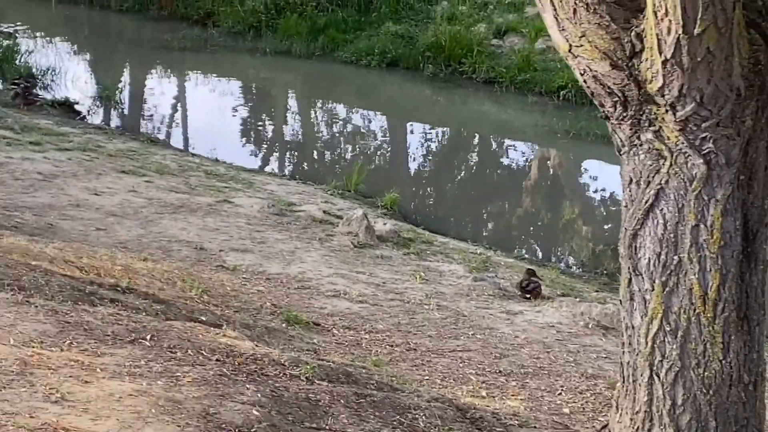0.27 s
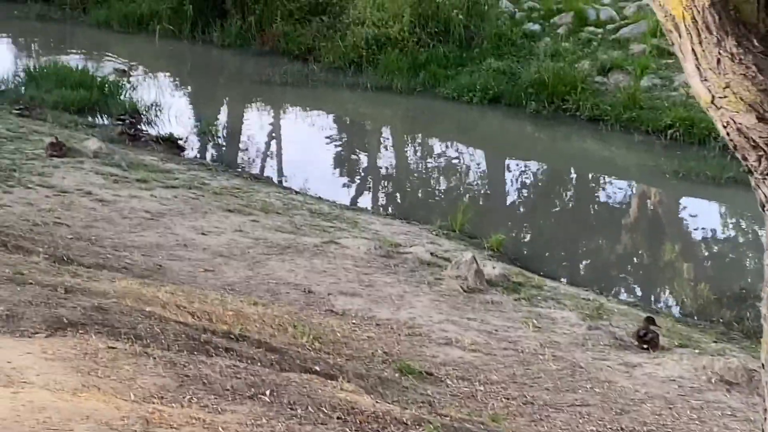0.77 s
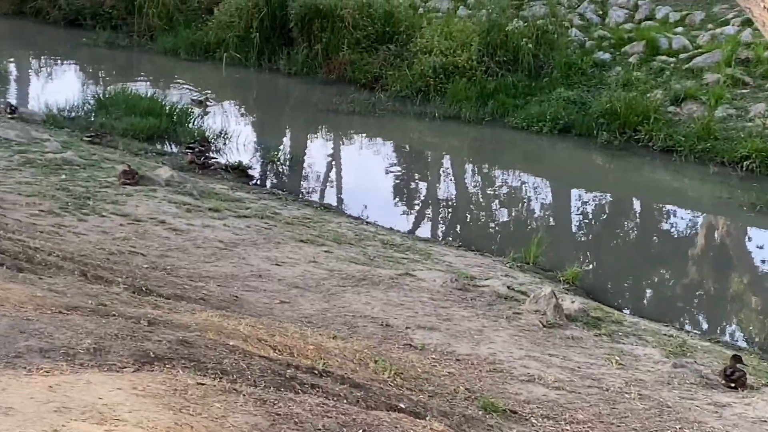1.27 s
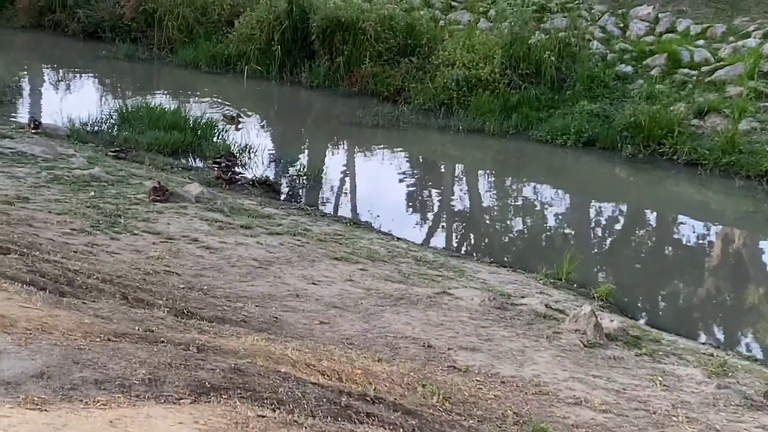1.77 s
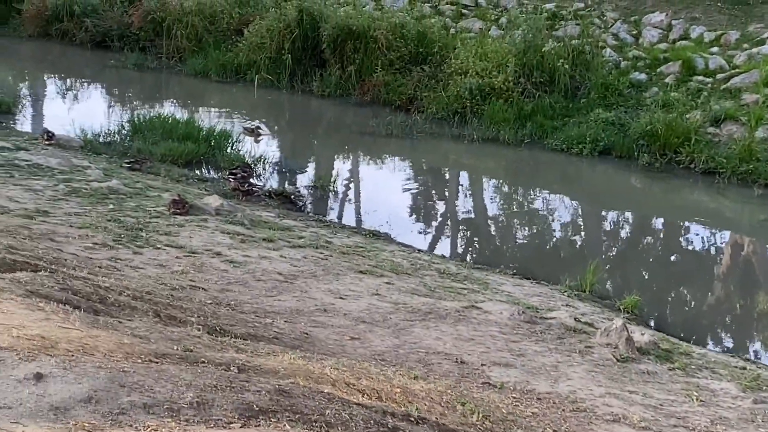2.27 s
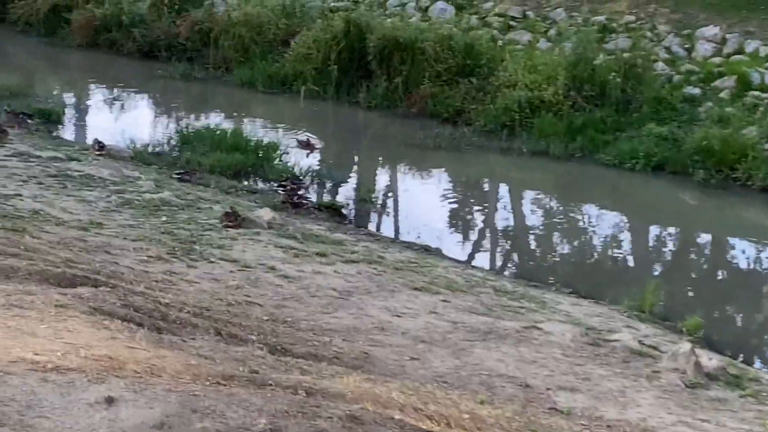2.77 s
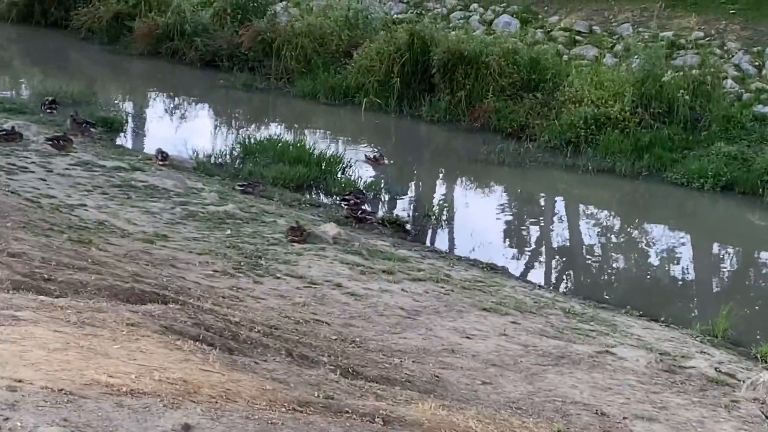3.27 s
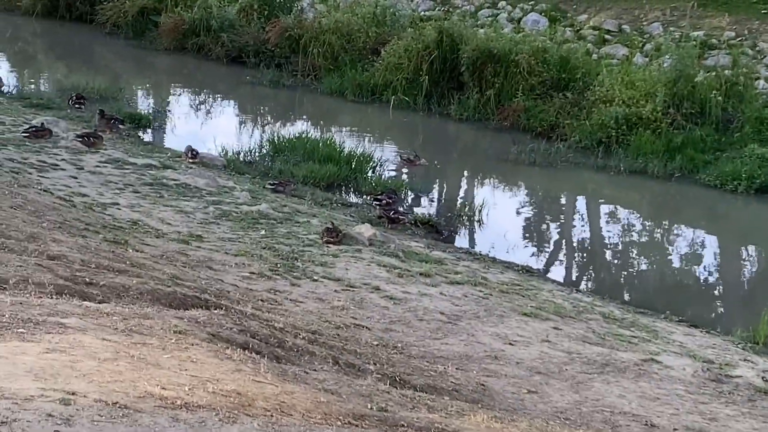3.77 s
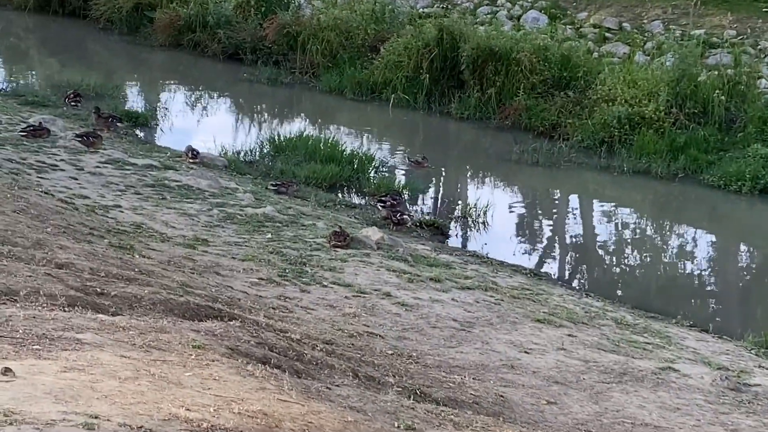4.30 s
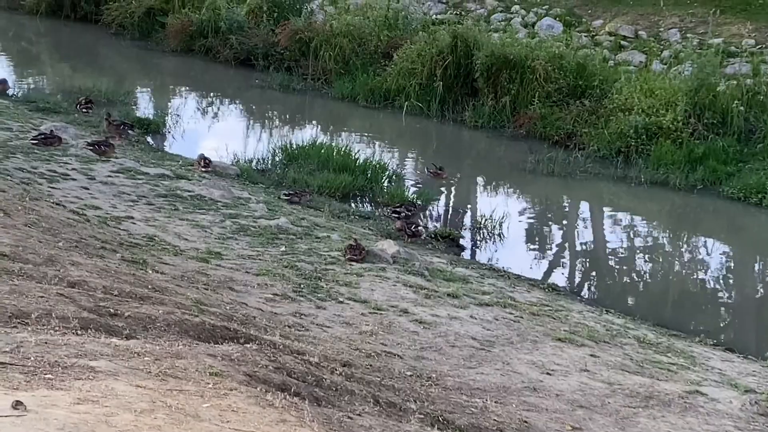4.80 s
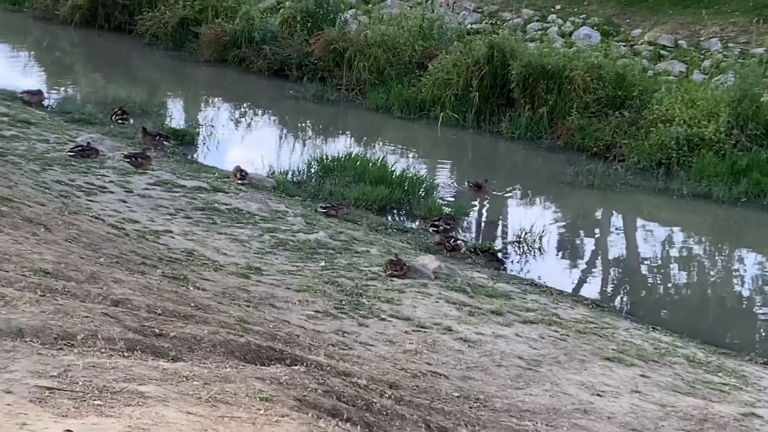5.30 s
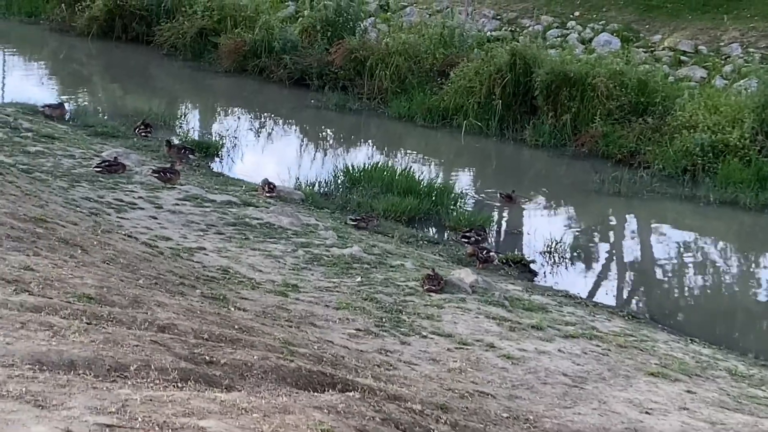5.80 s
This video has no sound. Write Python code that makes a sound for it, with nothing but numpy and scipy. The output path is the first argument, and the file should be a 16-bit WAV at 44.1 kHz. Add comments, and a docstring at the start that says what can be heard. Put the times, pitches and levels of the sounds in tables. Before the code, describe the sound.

Irregular dull footsteps thud and crunch on dry dirt while sparrows chirp in the trees and a far road murmurs.

```python
"""Footsteps on the dry dirt bank of a slow stream, close under a phone held by the person stepping.
Heel and sole push on the ground in dull thuds; grit snaps and scrapes beneath them. Up in the trees
sparrows chirp in raspy arches of pitch and a smaller bird pipes thin notes above them, all scattered
by trunks and leaves. A far road murmurs with rumble and tyre noise, one engine slowly gathering speed."""
import sys
import numpy as np
from scipy import signal
from scipy.fft import rfft, irfft
from scipy.io import wavfile
from scipy.ndimage import uniform_filter1d

SR = 44100
rng = np.random.default_rng(int(sys.argv[2]) if len(sys.argv) > 2 else 0)


def int16_out(signal):
    """Quantize to a 16-bit WAV file."""
    q = np.round(np.clip(np.atleast_2d(signal).T, -1, 1) * 32767)
    wavfile.write(sys.argv[1], SR, q.astype(np.int16))


N = 266760
TIME = np.arange(N) / SR

# Spectra of the far road, its rumble and its tyres: frequency_hz, relative_density_db
RUMBLE_SPECTRUM = [(12, -46.5), (20, -20), (35, -5), (54, 3), (141, -9.5), (226, -17), (312, -18.5),
                   (338, -22), (500, -26), (650, -45), (1100, -120)]
TYRE_SPECTRUM = [(240, -35.5), (400, -8.5), (601, -5.5), (959, 1), (1230, -7), (1530, -6), (1720, -11.5),
                 (1870, -12), (2440, -16), (3140, -16), (4660, -20), (5250, -22), (5850, -25.5),
                 (6360, -24), (7000, -36.5), (9100, -75), (15400, -120)]
# Slow swells of the road, centred and scaled down in traffic(): time_s, rumble_db, tyre_db
ROAD_SWELLS = [(0.0, -32.5, -45.5), (0.35, -36, -47), (0.67, -31.5, -45.5), (1.11, -35.5, -46.5),
               (1.38, -39.5, -45), (2.85, -32.5, -45), (3.59, -38.5, -45), (4.19, -38, -45.5),
               (4.51, -39.5, -44), (5.71, -40, -44.5), (6.05, -38, -45)]
# Steps below the microphone, heel then sole: heel_s, heel_db, heel_hz, roll_s, sole_db, sole_hz
STEPS = [(.022, -23.5, 90, .018, -22, 71), (0.498, -16.5, 106, .043, -19, 91),
         (.666, -14.5, 85, 0.054, -14, 125), (0.811, -13, 75, .03, -19.5, 108),
         (1.936, -27, 117, 0.047, -22.5, 82), (2.126, -17.5, 93, 0.046, -22.5, 81),
         (2.265, -15.5, 78.7, 0.047, -29, 89), (2.379, -20.5, 91, .026, -26.5, 90),
         (2.556, -17.5, 71, 0.056, -22.5, 114), (2.836, -16.5, 94, .026, -20.5, 101),
         (2.902, -18, 104, 0.052, -11.5, 89), (3.058, -20, 133.6, 0.0087, -17, 95),
         (4.309, -19, 74, 0.043, -13, 70)]
# Weight dropping on a foot that is already flat: time_s, level_db, pitch_hz
WEIGHT_DROPS = [(.388, -23.5, 67), (.478, -25, 109), (.619, -26, 89.4), (.854, -16, 65.4),
                (1.135, -29.5, 68), (3.279, -16, 92)]
# Spells of restless shifting of weight: start_s, end_s, level_db
SHUFFLES = [(.45, .75, -27.5), (2.05, 2.85, -35)]
# The smaller bird's whistles: start_s, length_s, start_hz, held_hz, relative_db
WHISTLES = [(0.024, 0.063, 7150, 6500, -50), (0.311, 0.025, 4560, 5180, -39),
            (0.329, 0.076, 4350, 5920, -39), (.78, 0.036, 5400, 5280, -51.5),
            (1.162, .086, 5350, 5320, -53), (1.654, 0.063, 6430, 6340, -55.5),
            (2.0, 0.23, 5540, 5560, -53.5), (4.778, 0.032, 5730, 5500, -51.5),
            (4.917, 0.11, 4800, 4720, -48), (4.89, .07, 6300, 6200, -57.5), (5.124, 0.089, 6100, 6060, -63),
            (5.299, 0.077, 6600, 6530, -55), (5.301, .02, 5280, 5250, -49), (5.347, .02, 4840, 4830, -49),
            (5.617, 0.086, 6300, 5570, -42.5), (5.779, .034, 6120, 5900, -41.5),
            (5.82, 0.077, 5300, 4960, -42.5)]
# Single sparrow chirps: top_s, length_s, top_hz, level_db
CHIRPS = [(0.97, 0.061, 4940, -38.5), (1.036, 0.068, 3530, -46), (1.267, 0.048, 4340, -46.5),
          (1.306, 0.037, 3850, -45.5), (1.485, 0.055, 4300, -39), (1.982, 0.058, 4730, -39.5),
          (2.057, 0.044, 3520, -41), (2.085, 0.023, 5200, -37.5), (2.136, .03, 4150, -36),
          (2.298, .04, 4230, -41), (2.728, 0.027, 4400, -47), (2.758, 0.035, 3880, -44),
          (4.232, 0.054, 3960, -45.5), (5.7, 0.061, 4540, -40.5), (5.77, 0.052, 3910, -39.5),
          (5.917, 0.068, 4580, -43)]
# The four arches of a chirrup, high and low in turn: top_delay_s, length_s, top_hz
CHIRRUP_ARCHES = [(0, .056, 4570), (0.075, .036, 3498), (0.124, .044, 4900), (.208, .05, 3870)]
# Sparrow chirrups: first_top_s, then level_db for each of the four arches
CHIRRUPS = [(3.26, -38, -33.5, -46.5, -56), (3.97, -40.5, -30, -43, -48), (4.981, -37.5, -38.5, -39.5, -51)]
# Drawn-out falling sparrow buzzes: start_s, level_db
BUZZES = [(0.059, -44), (.99, -50), (1.85, -45), (5.795, -47)]
# Sparrow slurs, rising or falling: start_s, length_s, start_hz, end_hz, level_db
SLURS = [(0.173, .048, 3190, 4460, -41.5), (0.188, 0.023, 4070, 5080, -45), (1.51, 0.03, 3346, 2760, -38.5),
         (2.147, 0.02, 3170, 2620, -39.5), (2.33, .035, 2880, 2895, -39), (2.358, .025, 3930, 4220, -41),
         (5.383, .03, 3490, 4230, -47.5), (5.498, 0.016, 3200, 3880, -47)]
# The loudest grains and twigs snapping underfoot: start_s, relative_db, pitch_hz
SNAPS = [(.266, -24, 1900), (0.5369, -11, 1200), (.5893, -23.5, 1350), (2.6237, -17, 530),
         (2.8023, -19, 2300), (2.812, -21.5, 2100), (3.791, -23.5, 1900), (3.83, -26.5, 2200),
         (3.907, -23, 1300), (3.918, -24.5, 1700), (4.687, -23.5, 1800), (5.037, -18.5, 2100),
         (5.479, -24, 1800), (5.491, -33, 2600), (5.694, -22.5, 2070)]
# Short scrapes of a sole: start_s, length_s (capped at 0.1), level_db, brightness_hz
SCUFFS = [(1.678, 0.098, -49, 1700), (2.606, 0.027, -36, 2400), (3.081, 0.066, -44, 1200),
          (3.573, 0.027, -41, 3200), (3.773, 0.14, -54, 2520), (4.463, 0.027, -47.5, 2970),
          (5.47, 0.028, -41, 3330), (6.005, 0.021, -35, 4970)]
# Strong orders of the far exhaust: firing_multiple, relative_db
EXHAUST_ORDERS = [(4, -2), (5, 3), (6, -1.5), (7, -16.5)]


def undb(db):
    """Decibels to gain."""
    return 10 ** (np.asarray(db) / 20)


def unit(x):
    """Scale to rms 1."""
    return x / np.sqrt(np.mean(x ** 2))


def add(out, start_s, x):
    """Mix x into out from start_s on."""
    i = max(int(start_s * SR), 0)
    out[i:i + len(x)] += x[:max(N - i, 0)]


def band(x, low_hz, high_hz, order=2):
    """Causal band-pass."""
    sos = signal.butter(order, [low_hz, min(high_hz, .45 * SR)], "band", fs=SR, output="sos")
    return signal.sosfilt(sos, x)


def wander(rate_hz):
    """Random levels held for 1 / rate_hz seconds and smoothed twice; rms 1."""
    hold = int(SR / rate_hz)
    levels = np.repeat(rng.standard_normal(N // hold + 2), hold)
    return unit(uniform_filter1d(uniform_filter1d(levels, hold), hold)[:N])


def murmur(spectrum, flicker_db, flicker_hz):
    """Noise of a given colour whose octaves waver on their own."""
    hz, db = np.transpose(spectrum)
    octave = np.log2(np.arange(N // 2 + 1) * SR / N + 1)
    coloured = rfft(rng.standard_normal(N)) * undb(np.interp(octave, np.log2(hz), db))
    bands = (irfft(coloured * np.clip(1 - abs(octave - k), 0, 1), N) for k in range(3, 15))
    return unit(sum(x * undb(flicker_db * wander(flicker_hz)) for x in bands))


def traffic(rumble_db=-33.5, tyre_db=-43, rumble_swing=0.52, tyre_swing=0.8):
    """Low rumble and tyre noise from a far road, swelling slowly."""
    times, *levels = np.transpose(ROAD_SWELLS)
    rumble_swell, tyre_swell = (np.interp(TIME, times, db - np.median(db)) for db in levels)
    rumble = murmur(RUMBLE_SPECTRUM, flicker_db=-1.63, flicker_hz=2.96)
    tyres = murmur(TYRE_SPECTRUM, flicker_db=1.4, flicker_hz=7)
    return (rumble * undb(rumble_db + rumble_swing * rumble_swell)
            + tyres * undb(tyre_db + tyre_swing * tyre_swell))


def foot_blows(knock_gap_s=.055, knock_hz=130, scatter_db=2, scatter_octaves=0.51):
    """Weight drops, heels, soles and the uneven knocks of shifting weight: time_s, level_db, pitch_hz."""
    blows = list(WEIGHT_DROPS)
    for heel_s, heel_db, heel_hz, roll_s, sole_db, sole_hz in STEPS:
        blows += [(heel_s, heel_db, heel_hz), (heel_s + roll_s, sole_db, sole_hz)]
    for start_s, end_s, db in SHUFFLES:
        chance = rng.standard_normal(size=(40, 3))
        for due_s, (late, loud, high) in zip(np.arange(start_s, end_s, knock_gap_s), chance):
            hz = knock_hz * 2 ** (scatter_octaves * high)
            blows.append((due_s + late * knock_gap_s / 4, db + scatter_db * loud, hz))
    return blows


def footfalls(width_cycles=0.7, shudder_db=-19, shudder_s=0.025, edge_db=-13, edge_ratio=1.708):
    """Close by, each foot gives one soft push and rebound with a quicker edge; the ground shudders."""
    out, t = np.zeros(N), np.arange(-SR // 50, SR // 6) / SR
    for time_s, db, hz in foot_blows():
        phase = 2 * np.pi * hz * t
        envelope = np.exp(-.5 * (t * hz / width_cycles) ** 2)
        push = (undb(edge_db) * np.sin(edge_ratio * phase) - np.cos(phase)) * envelope
        ground = unit(band(rng.standard_normal(len(t)), 33, 150, order=3))
        shudder = undb(shudder_db) * ground * np.exp(-abs(t) / shudder_s)
        add(out, time_s + t[0], undb(db) * (push + shudder))
    return out


def song(notes, waver, rasp, strain, flutter_db, upper_db, upper_ratio, aim):
    """Trembling near-sine notes with a faint higher voice: (towards the microphone, into the trees)."""
    direct, spread = np.zeros(N), np.zeros(N)
    tremble, flutter = wander(900), wander(300)
    usual_db = np.median([db for _, _, db, _ in notes])
    for start_s, pitch_hz, db, shading_db in notes:
        n, i = len(pitch_hz), int(abs(start_s) * SR)
        # drawn-out notes turn to a buzz, most where pushed high
        depth = waver + rasp * n / SR * (pitch_hz / pitch_hz.min()) ** strain
        hz = pitch_hz * (1 + depth * np.resize(tremble[i:i + n], n))
        phase = 2 * np.pi * np.cumsum(hz) / SR
        swell = np.sin(np.pi * np.linspace(0, 1, n)).clip(0) ** 0.42
        gain = undb(db + shading_db + flutter_db * np.resize(flutter[i:i + n], n))
        note = swell * gain * (np.sin(phase) + undb(upper_db) * np.sin(upper_ratio * phase))
        add(direct, start_s, note)
        # the loudest notes are aimed at the microphone, so the trees get a more even share
        add(spread, start_s, note * undb(aim * (usual_db - db) - shading_db))
    return direct, spread


def trees(x, wet_db, t60_s, far_db, far_s=.13):
    """Trunks and leaves scatter many small echoes; the far bank sends back a later, blurred one."""
    t = np.arange(SR) / SR
    near = (1 - np.exp(-t / 0.0084)) * undb(-60 * t / t60_s)
    far = undb(far_db) * np.exp(-.5 * ((t - far_s) / 0.022) ** 2)
    wet = 0
    for k in range(3):  # the echo paths change as the microphone moves
        echoes = rng.standard_normal(SR) * rng.exponential(size=SR) * (near + far)
        share = np.sqrt(2 / 3) * np.cos(TIME + k * np.pi / 3)
        wet = wet + signal.fftconvolve(x * share, echoes / np.linalg.norm(echoes))[:N]
    return undb(wet_db) * wet


def piping_bird(settle_s=0.01, fade_db=-3):
    """A small bird in the trees: each thin whistle settles quickly on a held pitch and fades a little."""
    notes = []
    for start_s, length_s, start_hz, held_hz, db in WHISTLES:
        t = np.arange(int(length_s * SR)) / SR
        pitch_hz = held_hz + (start_hz - held_hz) * np.exp(-t / settle_s)
        notes.append((start_s, pitch_hz, db, fade_db * (t / length_s - .5)))
    direct, spread = song(notes, waver=.005, rasp=0.086, strain=.3, flutter_db=3,
                          upper_db=-25.5, upper_ratio=2, aim=0.12)
    return direct + trees(spread, wet_db=-3.5, t60_s=.45, far_db=-16)


def glide(length_s, start_hz, end_hz):
    """Pitch that slides evenly."""
    return np.geomspace(start_hz, end_hz, int(length_s * SR))


def chirp(top_s, length_s, top_hz, db, rise_share=.33, top_dip_db=-4, lead_s=0.033, lead_db=-15):
    """An arch of pitch, quick up, slower down, thin at its top; a second voice slips in just ahead."""
    climb = np.interp(np.linspace(0, 1, int(length_s * SR)), [0, rise_share, 1], [0, 1, 0])
    height = np.sin(np.pi / 2 * climb) ** 3.2
    foot_hz = 3260 * (top_hz / 4004) ** 0.35  # higher arches stand on a higher foot
    arch_hz = foot_hz + (top_hz - foot_hz) * height
    lead = (top_s - lead_s, glide(0.02, 1.12 * top_hz, 1.3 * top_hz), db + lead_db, 0)
    arch = (top_s - rise_share * length_s, arch_hz, db, top_dip_db * (height - .5))
    return [lead, arch]


def sparrows():
    """Raspy chirrups, single chirps, falling buzzes and slurs, heard direct and off the trees."""
    notes = []
    for first_top_s, *levels in CHIRRUPS:
        for (delay_s, length_s, top_hz), db in zip(CHIRRUP_ARCHES, levels):
            notes += chirp(first_top_s + delay_s, length_s, top_hz, db)
    for row in CHIRPS:
        notes += chirp(*row)
    for start_s, db in BUZZES:
        notes.append((start_s, glide(length_s=.11, start_hz=4650, end_hz=3150), db, 0))
    for start_s, length_s, start_hz, end_hz, db in SLURS:
        notes.append((start_s, glide(length_s, start_hz, end_hz), db, 0))
    direct, spread = song(notes, waver=0.016, rasp=.4, strain=1.4, flutter_db=3.5,
                          upper_db=-16, upper_ratio=1.28, aim=0.23)
    return direct + trees(spread, wet_db=-1.6, t60_s=.34, far_db=-17.5)


def crumbs(count=6, span_s=(3.1, 5.7), relative_db=-35.5, pitch_hz=2000):
    """Smaller grains give way at random under the standing weight: start_s, relative_db, pitch_hz."""
    return [(np.interp(when, [-1, 1], span_s), relative_db + 3 * loud, pitch_hz * 2 ** (.3 * high))
            for when, loud, high in rng.uniform(-1.1, 1.1, size=(count, 3))]


def grit(rise_cycles=0.28, crack_db=-15, crack_s=0.002):
    """A grain breaks underfoot with a dead ring of two or three cycles and a trace of crumbling."""
    out, t = np.zeros(N), np.arange(SR // 30) / SR
    for start_s, db, hz in SNAPS + crumbs():
        age = t * hz / rise_cycles
        ring = np.sin(2 * np.pi * hz * t) * age * np.exp(1 - age)
        crack = unit(band(rng.standard_normal(len(t)), .5 * hz, 1.87 * hz)) * np.exp(-t / crack_s)
        add(out, start_s, undb(db) * (ring + undb(crack_db) * crack))
    return out


def scuffs(spread_db=0.5):
    """A sole sliding on the dirt sets off a dense run of uneven little clicks."""
    out = np.zeros(N)
    for start_s, length_s, db, hz in SCUFFS:
        grains = rng.standard_normal(SR // 10) * undb(spread_db * rng.exponential(size=SR // 10))
        n = int(min(length_s, .1) * SR)
        scrape = band(grains[:n], 0.3 * hz, 1.13 * hz) * np.hanning(n) ** .5
        add(out, start_s, undb(db) * unit(scrape))
    return out


def engine(nearest_s=5.03, nearest_hz=41.73, climb_hz_per_s=2.9, level_db=-42, stay_s=0.27):
    """Only low exhaust orders carry this far; they climb steadily and swell as the engine comes near."""
    t = TIME - nearest_s
    firing_hz = (nearest_hz + climb_hz_per_s * t) * (1 + 0.009 * wander(10))
    phase = 2 * np.pi * np.cumsum(firing_hz) / SR
    exhaust = sum(undb(db + 2.1 * wander(4.2)) * np.sin(order * phase) for order, db in EXHAUST_ORDERS)
    relative_distance = np.hypot(1, t / stay_s)
    return unit(exhaust) * undb(level_db) / relative_distance


def scene():
    """From the bank, in mono: feet close by, birds in the trees, the road far off."""
    feet = footfalls() + undb(-2.5) * grit() + scuffs()
    birds = undb(0.04) * sparrows() + undb(-1.5) * piping_bird()
    road = traffic() + engine()
    return (feet + birds + road)[None]


def record(dry, low_hz=24, top_hz=6950):
    """The hand-held phone's microphone sheds the deepest bass and cuts the top steeply."""
    low_cut = signal.butter(2, low_hz, "high", fs=SR, output="sos")
    top_cut = signal.ellip(10, .2, 75, top_hz, fs=SR, output="sos")
    return signal.sosfilt(top_cut, signal.sosfiltfilt(low_cut, dry))


dry = scene()
out = record(dry)
int16_out(out)
```